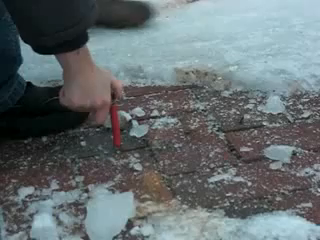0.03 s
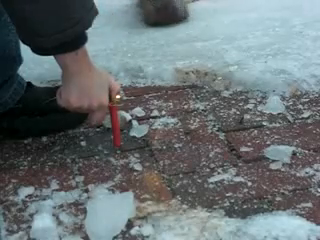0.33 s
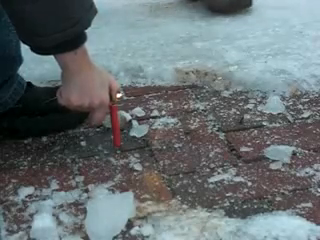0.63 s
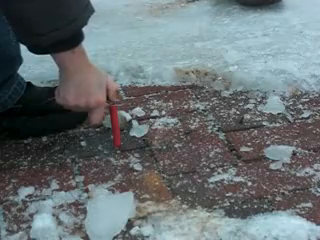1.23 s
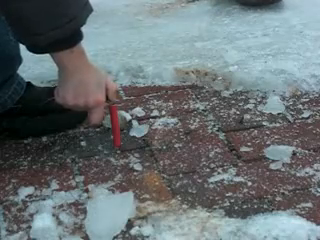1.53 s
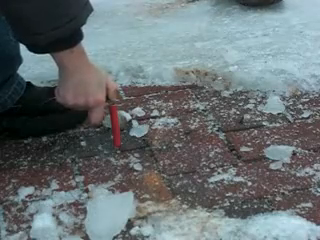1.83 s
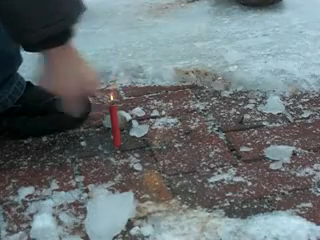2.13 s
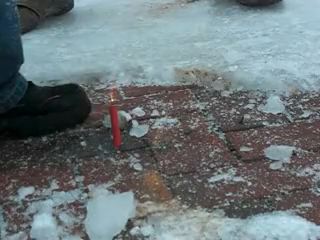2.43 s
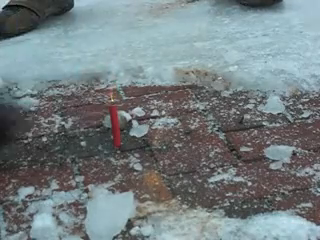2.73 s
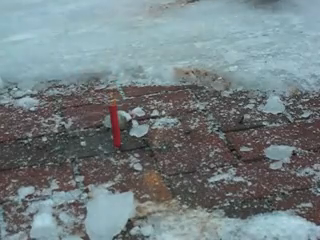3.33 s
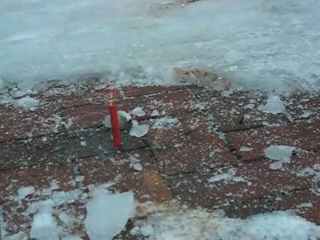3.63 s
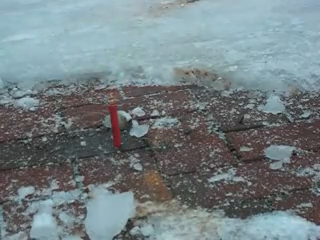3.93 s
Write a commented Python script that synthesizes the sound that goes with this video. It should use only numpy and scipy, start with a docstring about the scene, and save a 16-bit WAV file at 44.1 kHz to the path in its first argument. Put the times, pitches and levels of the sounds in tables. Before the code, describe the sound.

A firecracker fuse hisses outdoors on icy paving. For the first second, shoes shuffle on frozen grit, and a lighter rasps once at 0.4 seconds. Faint lighter ticks follow until about 1.9. At 2.1 the fuse suddenly catches, hissing to the end and spitting small sparks. From 2.6, steps hurry away, crunching and cracking ice. Wind rumbles and bumps on the microphone throughout, over faint distant noise.

```python
"""Outdoors on icy paving, a firecracker is lit. Shoes shuffle, grinding frozen grit and cracking crumbs
of ice, while wind bumps the microphone over faint distant noise. A lighter's wheel rasps on its flint,
then the lighter ticks faintly. A moment later the fuse suddenly catches and hisses, a jet of gas
spitting small sparks, while crunching steps hurry away."""
import sys
import numpy as np
from scipy import signal
from scipy.fft import rfft, irfft
from scipy.io import wavfile
from scipy.ndimage import uniform_filter1d

SR = 44100
rng = np.random.default_rng(int(sys.argv[2]) if len(sys.argv) > 2 else 0)


def master_out(mix):
    """Clip the mix to full scale and print it as 16-bit PCM to the path in sys.argv[1]."""
    frames = np.transpose(np.atleast_2d(mix))
    ceiling = np.clip(frames, -1, 1)
    pcm = np.round(ceiling * 32767).astype(np.int16)
    wavfile.write(sys.argv[1], SR, pcm)


N = 176400
T = np.arange(N) / SR
BINS_HZ = np.arange(N // 2 + 1) * SR / N


def from_db(db):
    """Decibels to gain."""
    return 10 ** (np.asarray(db) / 20)


def unit_rms(x):
    """Scale to an RMS of 1."""
    return x / np.sqrt(np.mean(x ** 2) + 1e-20)


def in_time(rows):
    """Join (t/s, value) rows by straight lines."""
    return np.interp(T, *np.transpose(rows))


def ramp(start_s, length_s):
    """Linear rise from 0 to 1."""
    return np.clip((T - start_s) / length_s, 0, 1)


def release(start_s, decay_s):
    """Hold at 1, then decay exponentially."""
    return np.exp(-np.clip((T - start_s) / decay_s, 0, 20))


def coloured(x, spectrum):
    """Minimum-phase filter from (f/Hz, level/dB) rows; unit RMS out."""
    hz, db = np.transpose(spectrum)
    gain = from_db(np.interp(np.log(np.maximum(BINS_HZ, 1)), np.log(hz), db))
    cepstrum = irfft(np.log(gain), N)
    cepstrum[1:N // 2] *= 2
    cepstrum[N // 2 + 1:] = 0
    return unit_rms(irfft(rfft(x) * np.exp(rfft(cepstrum)), N))


def drift(rate_hz):
    """Random wander; unit RMS."""
    return unit_rms(irfft(rfft(rng.standard_normal(N)) / (1 + (BINS_HZ / rate_hz) ** 2) ** 2, N))


def grains(per_s, spread_db):
    """Random clicks, many small and a few large; unit RMS."""
    sizes = from_db(spread_db * np.minimum(rng.exponential(1, N), 3.8))
    return unit_rms(sizes * rng.choice([-1, 1], N) * (rng.random(N) < per_s / SR))


def grit(spectrum, spread_db, grains_per_s=3500, slide_db=-7.5):
    """A shower of crushed grains over smooth sliding noise."""
    crushed = grains(grains_per_s, spread_db)
    return coloured(crushed + from_db(slide_db) * rng.standard_normal(N), spectrum)


def snaps(rows, low_hz, click_gain=2.46, cutoff_hz=7630):
    """One sharp click per row, with a noise burst that dies within milliseconds."""
    out, t = np.zeros(N + SR), T[:SR // 50]
    lowpass = signal.butter(4, cutoff_hz, fs=SR, output="sos")
    for start_s, peak_db, top_hz, decay_s in rows:
        burst = rng.standard_normal(len(t)) * np.exp(-t / decay_s) + click_gain * (t == 0)
        band = signal.butter(1, [low_hz, top_hz], "band", fs=SR, output="sos")
        snap = signal.sosfilt(lowpass, signal.sosfilt(band, burst))
        start = int(start_s * SR)
        out[start:start + len(t)] += from_db(peak_db) * snap / np.abs(snap).max()
    return out[:N]


# Soles on grit: t/s, length/s, grind level/dB, grind centre/Hz, crunch level/dB
SOLE_SCUFFS = [(0.12, 0.027, -33, 850, -46), (0.149, 0.089, -33, 1020, -45),
               (0.239, 0.067, -40.5, 1200, -44), (0.308, 0.224, -42, 1000, -48),
               (0.452, 0.1, -43.5, 500, -46.5), (0.536, 0.047, -34, 700, -42.5),
               (0.587, 0.054, -38, 850, -44.5), (0.64, 0.039, -36, 790, -41),
               (0.68, .08, -49.5, 1320, -49.5), (0.749, 0.039, -46, 1380, -45.5),
               (0.785, 0.1, -50, 890, -51), (0.892, 0.071, -57.5, 920, -56.5),
               (0.957, 0.061, -59, 910, -57), (1.016, 0.17, -63.5, 900, -61.5),
               (2.611, 0.0044, -32.5, 500, -28.5), (2.623, 0.011, -39, 600, -36.5),
               (2.637, 0.021, -32, 870, -24), (2.658, 0.012, -34, 600, -33.5),
               (2.777, 0.022, -38, 920, -41), (2.987, 0.035, -38, 880, -44.5),
               (3.019, 0.051, -36, 1100, -37.5), (3.096, 0.019, -44, 786, -31.5),
               (3.114, 0.039, -30.5, 870, -28), (3.156, 0.027, -32.5, 590, -33.5),
               (3.226, 0.0055, -36, 503, -38), (3.253, 0.083, -40.5, 454, -43),
               (3.487, 0.019, -29.5, 230, -48), (3.538, 0.058, -30, 530, -31),
               (3.606, 0.058, -40.5, 710, -38.5), (3.725, 0.13, -42, 1350, -43),
               (3.919, 0.037, -29.5, 410, -33.5), (3.975, 0.026, -30, 494, -45)]
# Low grind and bright crunch: f/Hz, relative level/dB
GRIND_SPECTRUM = [(100, -1), (250, 11), (600, 3), (1200, 0.5), (2000, 0.5), (3200, -7.5), (6000, -9),
                  (10000, -18)]
CRUNCH_SPECTRUM = [(200, -23), (1200, -6.5), (2500, 4.5), (4000, 5.5), (6000, 5), (7500, 2), (9000, -4.5),
                   (10000, -22.5)]
# Ice crumbs cracking: t/s, peak/dB, band top/Hz, decay/s
ICE_CRACKS = [(.185, -27, 2500, .001), (.2335, -23, 4000, 0.00094), (.383, -21.5, 1400, 0.0014),
              (.400, -22, 9000, .0003), (.4675, -23.5, 800, 0.0021), (.5485, -20.5, 1200, 0.0031),
              (.552, -24, 1600, .002), (.680, -23.5, 5000, .001), (.696, -26, 2500, 0.00089),
              (.712, -29, 1200, 0.0018), (.811, -28.5, 1200, 0.0011), (.8312, -25, 9000, 0.00062),
              (.862, -29.5, 2500, 0.0022), (.876, -31.5, 2500, .002), (.8985, -31, 7000, 0.00037),
              (.9175, -32, 5000, 0.0011), (.9295, -32, 3500, 0.0013), (1.000, -34.5, 1800, 0.0025),
              (2.6128, -27, 7000, 0.00073), (2.6357, -9, 7000, 0.0012), (2.649, -12.5, 6000, 0.00056),
              (2.6553, -8.5, 8000, 0.00073), (2.782, -19, 3000, 0.00092), (2.7855, -18, 3000, 0.0012),
              (2.844, -20, 5500, 0.0042), (2.992, -21.5, 3000, 0.0022), (3.006, -17, 1400, 0.00078),
              (3.039, -11.5, 4500, 0.00083), (3.0555, -15, 7000, 0.00068), (3.1025, -20, 6000, 0.0011),
              (3.1168, -9.5, 8000, 0.00097), (3.1183, -10, 7000, .001), (3.1402, -14, 2500, .0012),
              (3.146, -9, 5000, 0.0009), (3.1745, -16, 6000, 0.00083), (3.757, -19.5, 3500, 0.0024),
              (3.982, -15.5, 3500, 0.0017)]


def shoes(attack_s=0.0011, release_s=0.0064, edge_ratio=1.76, clump_db=1.22):
    """Each scuff grinds in its own broad band and crunches above it; larger crumbs crack singly."""
    grind = grit(GRIND_SPECTRUM, spread_db=3)
    crunch = grit(CRUNCH_SPECTRUM, spread_db=-1)
    grinding, crunch_gain = 0, 0
    for start_s, length_s, grind_db, centre_hz, crunch_db in SOLE_SCUFFS:
        press = ramp(start_s, attack_s) * release(start_s + length_s, release_s)
        edges_hz = [centre_hz / edge_ratio, centre_hz * edge_ratio]
        band = signal.butter(1, edges_hz, "band", fs=SR, output="sos")
        grinding += from_db(grind_db) * press * unit_rms(signal.sosfilt(band, grind))
        crunch_gain = np.maximum(crunch_gain, from_db(crunch_db) * press)
    clumps = unit_rms(from_db(clump_db * drift(rate_hz=200)))   # grains give way in clumps
    return clumps * (grinding + crunch_gain * crunch) + snaps(ICE_CRACKS, low_hz=350)


# Reflections: delay/s, level/dB
REFLECTIONS = [(.006, -24.5), (0.017, -27), (.043, -18.5)]


def with_echoes(x):
    """Direct sound plus weak echoes off the paving and nearby walls."""
    return x + sum(from_db(db) * np.interp(T - delay_s, T, x, left=0) for delay_s, db in REFLECTIONS)


def turbulence(spectrum, lump_db, rate_hz, window_s=0.08):
    """Lumpy noise, levelled over the window so that only quicker lumps remain."""
    lumpy = coloured(rng.standard_normal(N), spectrum) * from_db(lump_db * drift(rate_hz))
    power = uniform_filter1d(lumpy ** 2, int(window_s * SR))
    return lumpy / np.sqrt(np.maximum(power, 1e-12))


# Wind strength: t/s, level/dB
GUSTS = [(.13, -35), (.28, -41.5), (.72, -38.5), (.86, -40.5), (1.0, -50), (1.06, -43.5), (1.16, -27.5),
         (1.25, -35), (1.4, -33), (1.46, -38), (1.6, -32.5), (1.68, -43.5), (1.79, -29.5), (1.88, -31),
         (1.99, -34), (2.03, -27.5), (2.1, -29), (2.24, -41), (2.43, -35), (2.55, -41.5), (2.62, -36.5),
         (2.88, -39), (2.94, -41.5), (3.04, -37), (3.4, -39.5), (3.65, -35.5), (3.79, -29.5), (4.0, -29)]
# Rumble and small eddies: f/Hz, relative level/dB
RUMBLE_SPECTRUM = [(15, -15.5), (28, -4.5), (45, 2.5), (75, 2), (120, -4), (180, -12), (300, -28.5),
                   (500, -37), (1000, -66)]
EDDY_SPECTRUM = [(50, -6), (120, 1), (200, 0), (330, -13), (500, -21.5), (1000, -50.5)]
# Buffets of air: t/s, peak/dB, centre/Hz
AIR_BUFFETS = [(1.170, -23.5, 224), (1.190, -31, 226), (1.874, -25, 200), (1.886, -26, 280),
               (1.896, -17.5, 114), (1.950, -14.5, 226), (1.955, -16, 98), (2.096, -24.5, 180),
               (2.128, -27.5, 170), (2.184, -28.5, 137), (2.887, -26, 123), (3.185, -25, 260),
               (3.453, -27, 148), (3.495, -19, 110), (3.507, -11, 68), (3.534, -18, 240), (3.713, -16, 113),
               (3.945, -15, 138)]


def wind(eddy_ref_db=-38, gust_ref_db=-28.5, eddy_growth=1.38):
    """Air on the microphone: rumble, eddies that grow faster than the gusts, and push-pull buffets."""
    gust_db = in_time(GUSTS)
    eddy_db = eddy_ref_db + eddy_growth * (gust_db - gust_ref_db)
    out = from_db(gust_db) * turbulence(RUMBLE_SPECTRUM, lump_db=3, rate_hz=25)
    out += from_db(eddy_db) * turbulence(EDDY_SPECTRUM, lump_db=8.5, rate_hz=45)
    for at_s, peak_db, centre_hz in AIR_BUFFETS:
        phase = 2 * np.pi * centre_hz * (T - at_s)
        out += from_db(peak_db) * phase * np.exp((1 - phase ** 2) / 2)
    return out


# Outdoor background: f/Hz, relative level/dB
DISTANT_SPECTRUM = [(100, 5.5), (300, -1), (600, 0), (1200, -3), (2500, -7.5), (5000, -10), (7500, -12),
                    (10000, -27)]


def distant_noise(level_db=-57.5):
    """Faint, steady noise from far off."""
    return from_db(level_db) * coloured(rng.standard_normal(N), DISTANT_SPECTRUM)


# Wheel on flint: f/Hz, relative level/dB
FLINT_SPECTRUM = [(500, -18), (1500, -6), (3500, -4), (5300, 1), (7000, -2), (8700, -0.5), (10000, -8.5)]
# Lighter ticks: t/s, peak/dB, band top/Hz, decay/s
LIGHTER_TICKS = [(1.107, -34, 8000, .0005), (1.115, -34.5, 2800, 0.00064), (1.166, -40, 8000, 0.0003),
                 (1.172, -42, 8000, .0005), (1.2328, -38, 7000, .0006), (1.2928, -36.5, 9000, 0.00067),
                 (1.4345, -45.5, 8000, .0005), (1.5587, -41, 6500, .0006), (1.626, -45, 4000, 0.00092),
                 (1.630, -37.5, 7000, 0.00089), (1.8535, -37, 5000, 0.0008)]


def lighter(start_s=0.396, stroke_s=0.023, rasp_db=-33):
    """The wheel rasps on the flint until the thumb slips off; ticks follow with the flame at the fuse."""
    stroke = ramp(start_s, stroke_s) * release(start_s + stroke_s, decay_s=0.0028)
    rasp = from_db(rasp_db) * stroke * grit(FLINT_SPECTRUM, spread_db=4)
    return rasp + snaps(LIGHTER_TICKS, low_hz=1800)


# Jet strength: t/s, level/dB
JET_LEVEL = [(2.11, -40.5), (2.33, -40), (2.36, -36), (2.385, -38.5), (2.425, -33.5), (2.48, -40),
             (2.6, -40), (2.72, -41), (2.88, -41), (2.97, -41.5), (3.2, -39.5), (3.3, -39), (3.44, -40),
             (3.56, -35), (3.75, -33.5), (4.0, -34.5)]
# Jet as the fuse catches, burns freely, burns low, reaches the tube: f/Hz, relative level/dB
CATCH_SPECTRUM = [(200, -17), (600, -3.5), (1200, -8), (1900, -5.5), (2550, -15.5), (3150, -5), (3600, -8),
                  (4000, 2), (4500, 2.5), (5000, -2.5), (5600, 4.5), (6500, -7.5), (7400, -11.5),
                  (8100, -2.5), (8500, -13), (9200, -6), (10000, -27)]
FREE_SPECTRUM = [(200, -2.5), (1200, -4), (2200, -3.5), (3300, -4), (4200, 3), (6000, 0.5), (7200, -6),
                 (8100, -6), (9300, -12), (10000, -16)]
LOW_SPECTRUM = [(200, -4.5), (800, -2), (1500, -9), (2800, -8), (4200, -3.5), (5000, -2), (6300, 0),
                (7400, -1.5), (8600, -14), (10000, -27.5)]
TUBE_SPECTRUM = [(200, -11.5), (800, -3), (1500, -6), (2800, -5.5), (4200, -5), (6300, -3), (7400, -7.5),
                 (8600, -15), (10000, -29)]
# Larger sparks: t/s, peak/dB, band top/Hz, decay/s
SPARK_SPITS = [(2.107, -34, 9500, .002), (2.356, -20, 5960, .003), (2.58, -28, 6000, .0006),
               (2.7545, -22, 8000, 0.001), (2.7655, -23, 9000, 0.0014), (2.802, -21, 7000, 0.00095),
               (2.8105, -21, 5000, .0012), (2.8705, -30, 9000, 0.00086), (2.878, -23, 6500, 0.0016),
               (2.8975, -22, 7000, .0007), (2.908, -25, 7000, 0.00074), (2.915, -29, 6500, 0.00063),
               (3.015, -21, 7950, 0.00093)]


def fuse(ignition_s=2.103, spark_db=-4.5, flutter_db=1.23):
    """A fluttering gas jet with tiny sparks and larger spits; its colour shifts as the fuse burns down."""
    crossfades_s = (2.355, 0.03), (3.03, 0.51), (3.55, 0.055)   # midpoint, length
    free, low, tube = (ramp(mid_s - length_s / 2, length_s) for mid_s, length_s in crossfades_s)
    gas = rng.standard_normal(N)
    sparks = from_db(spark_db) * free * grains(per_s=1200, spread_db=3)
    stages = [(1 - free, CATCH_SPECTRUM), (free * (1 - low), FREE_SPECTRUM),
              (low * (1 - tube), LOW_SPECTRUM), (tube, TUBE_SPECTRUM)]
    jet = sum(share * coloured(gas + sparks, spectrum) for share, spectrum in stages)
    jet_db = in_time(JET_LEVEL) + flutter_db * drift(rate_hz=60)
    return jet * ramp(ignition_s, length_s=0.004) * from_db(jet_db) + snaps(SPARK_SPITS, low_hz=2800)


def scene():
    """Shoes, lighter and fuse in windy open air; mono."""
    return (with_echoes(shoes() + lighter()) + fuse() + wind() + distant_noise())[None]


def record(dry):
    """The microphone opens after a moment and loses the deepest rumble and the top treble."""
    open_s, low_hz, top_hz = 0.13, 27, 9950
    highpass = signal.butter(2, low_hz, "high", fs=SR, output="sos")
    picked_up = signal.sosfilt(highpass, dry * (T >= open_s))
    return irfft(rfft(picked_up) / np.sqrt(1 + (BINS_HZ / top_hz) ** 160), N)   # steep low-pass


dry = scene()
out = record(dry)
master_out(out)
```